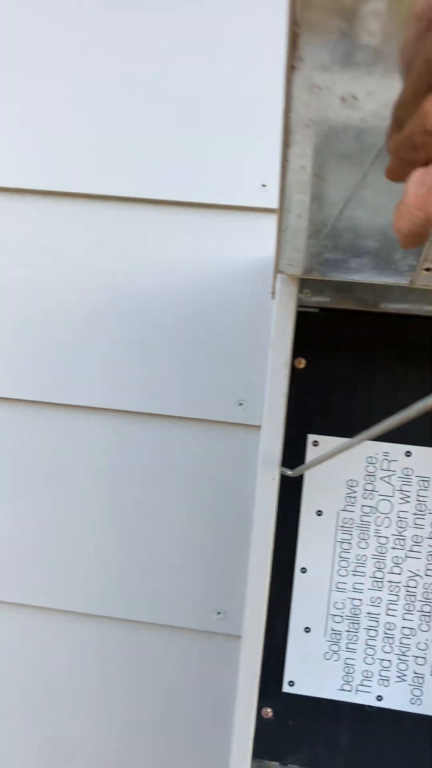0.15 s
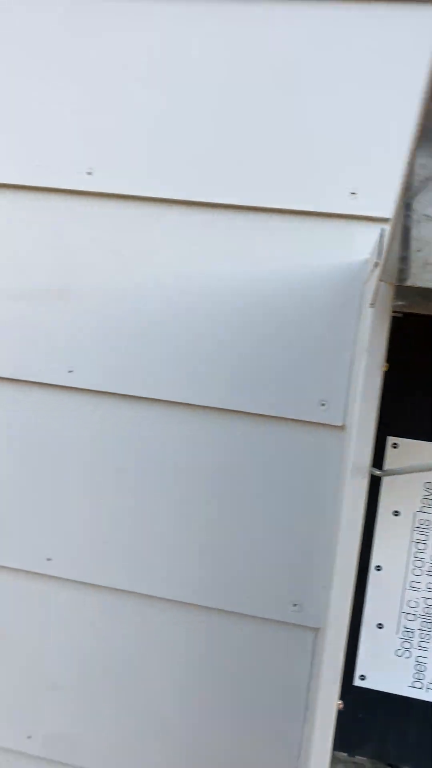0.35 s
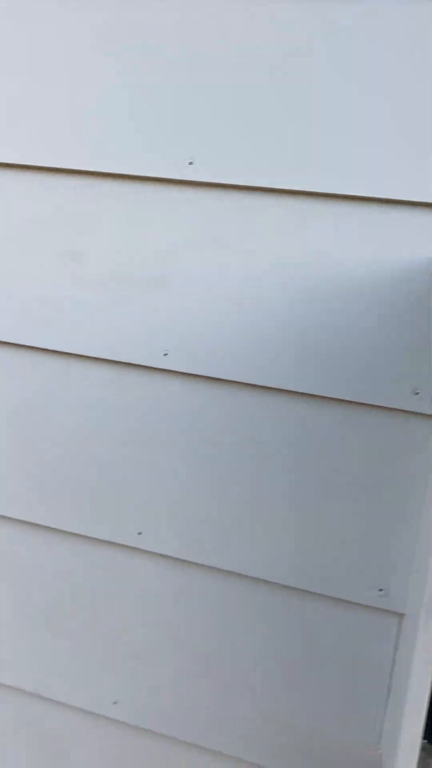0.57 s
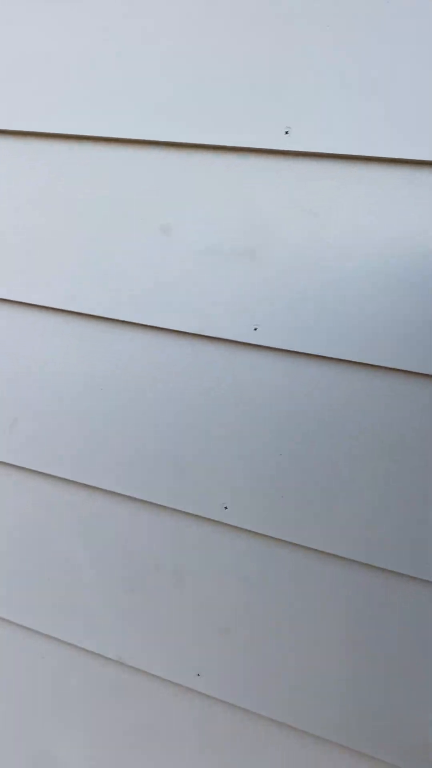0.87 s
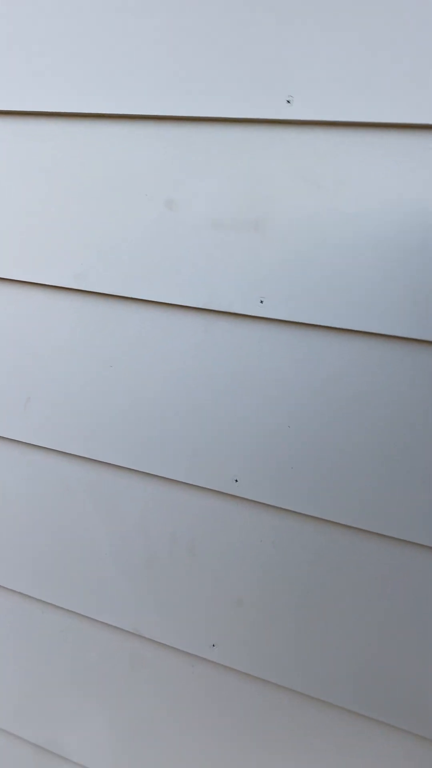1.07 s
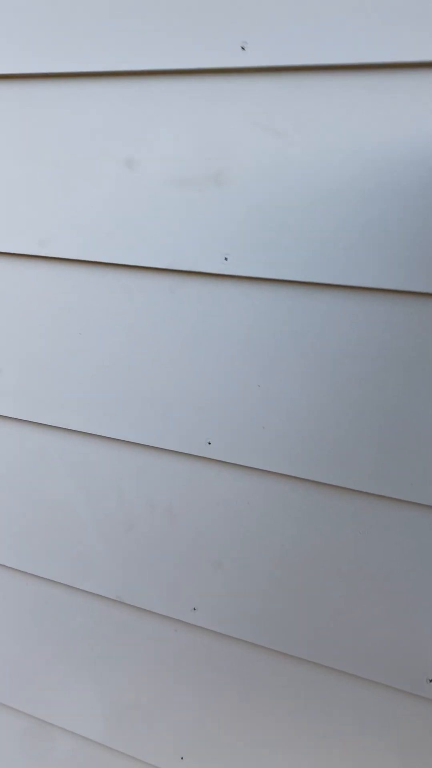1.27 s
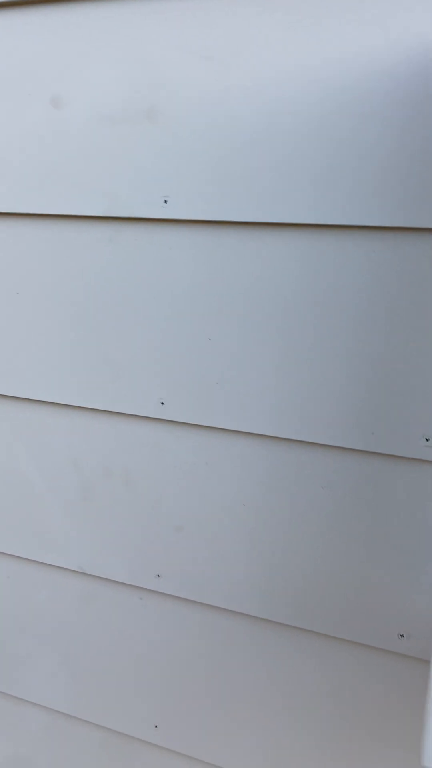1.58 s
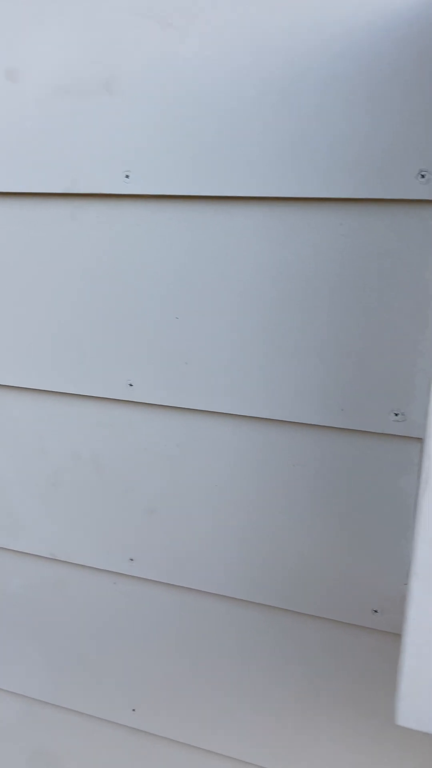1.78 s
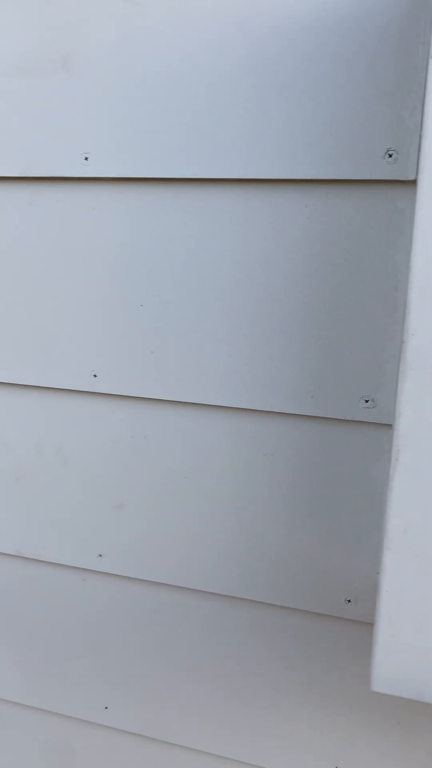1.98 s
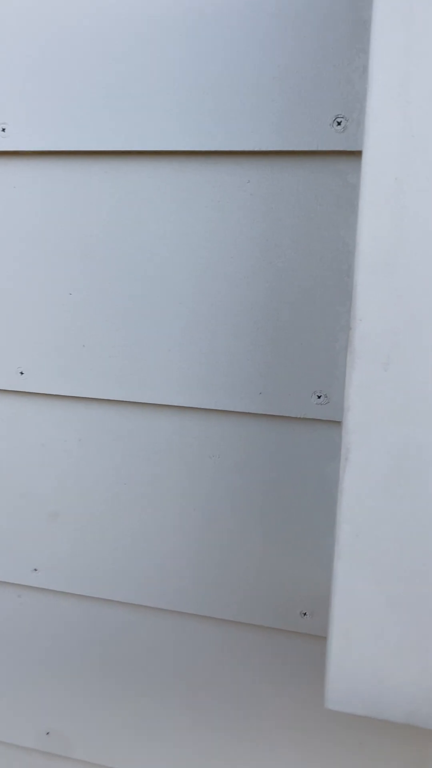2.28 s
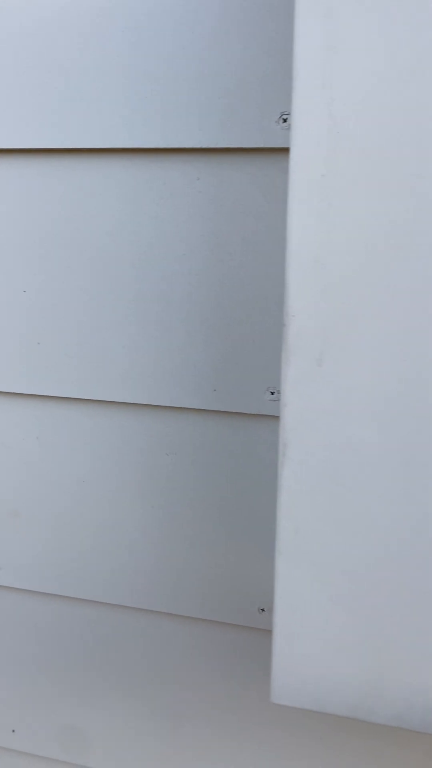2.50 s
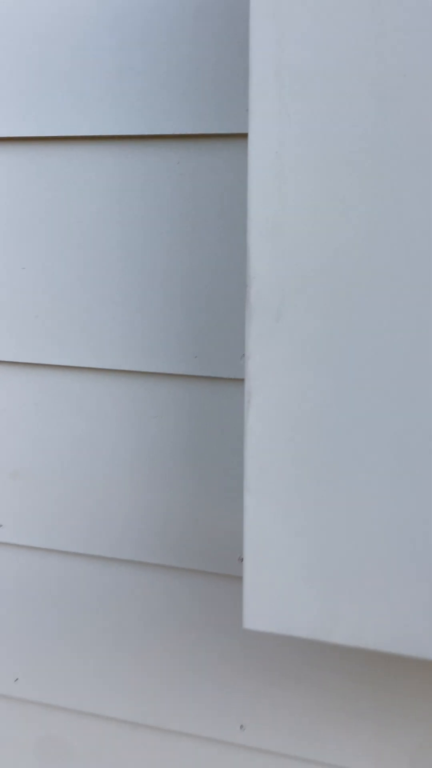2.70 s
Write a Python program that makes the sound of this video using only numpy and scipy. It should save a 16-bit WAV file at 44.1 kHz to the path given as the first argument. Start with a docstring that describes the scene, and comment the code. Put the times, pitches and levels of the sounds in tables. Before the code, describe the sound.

Close to a metal box on a house wall, quiet air, then a sharp rod clatter with thin ringing, a low hinge judder, light scrapes and a hard lid slam, followed by tiny ticks.

```python
"""Low rumble and quiet outdoor air are heard first, with a faint lid tap, scuffs and ticks: a metal box on a house wall.
Its steel stay rod drops and clatters on the frame: noise bursts over damped modes of frame and rod.
The lid shudders on its hinge (a gliding harmonic tone and scrape), rubs past the edge, touches and slams
shut (an air pulse, a crash and panel modes). Small ticks follow the slam; shaped noise gives scuffs and murmur.
"""
import sys
import numpy as np
from scipy import signal
from scipy.fft import rfft, irfft, next_fast_len
from scipy.io import wavfile
from scipy.ndimage import map_coordinates

SR = 44100
rng = np.random.default_rng(int(sys.argv[2]) if len(sys.argv) > 2 else 0)


def wrap_up_sound(samples):
    """Save the sound to the file named by the first command line argument, as 16-bit audio."""
    columns = np.atleast_2d(samples).T
    # keep every value between -1 and 1, then stretch to whole-number steps
    tamed = np.clip(columns, -1, 1)
    steps = np.round(tamed * 32767).astype(np.int16)
    wavfile.write(sys.argv[1], SR, steps)


N = 125685  # samples
T = np.arange(SR * 3 // 4) / SR  # s from the start of one contact
CRASH_DB = -11.5  # crash gain within any contact


def amp(db):
    """Level to amplitude: 20 dB is a factor of ten."""
    return 10 ** (np.asarray(db) / 20)


def unit(x):
    """Normalisation to an rms of 1."""
    return x / np.sqrt(np.mean(x ** 2) + 1e-20)


def along(points, hz):
    """Interpolation of (f/Hz, value) points on a logarithmic frequency axis."""
    f, v = np.transpose(points)
    return np.interp(np.log(hz + 1), np.log(f + 1), v)


def curves(rows):
    """Linear interpolation in time: one curve for each column after t/s."""
    s, *columns = np.transpose(rows)
    return [np.interp(np.arange(N) / SR, s, column) for column in columns]


def wobble(rate):
    """Slow random modulation: a smooth curve through random knots, rate knots a second."""
    knots = rng.standard_normal(int(N * rate / SR) + 4)
    return map_coordinates(knots, [np.arange(N) * rate / SR])


def hiss(colour, flutter_db, rate):
    """Spectral shaping of white noise, with a fluttering level and an rms of 1."""
    spectrum = rfft(rng.standard_normal(N))
    gain = amp(along(colour, np.fft.rfftfreq(N, 1 / SR)))
    coloured = irfft(spectrum * gain, N)
    return unit(coloured * amp(flutter_db * wobble(rate)))


def add(track, s, x):
    """Superposition: mix x into track from time s."""
    start = round(s * SR)
    track[start:][:len(x)] += x[:N - start]


def knock(hz, db, t60):
    """Single damped oscillator: one short note, falling 60 dB in t60."""
    return amp(db - 60 * T / t60) * np.sin(2 * np.pi * hz * T)


def snap(db, t60):
    """Impulsive contact noise: differencing brightens it, and it decays exponentially."""
    bright = np.diff(rng.standard_normal(len(T) + 1))
    return amp(db - 60 * T / t60) * bright


def ring(pitches, decays, tilt_db, favoured_hz):
    """Modal superposition: damped, beating modes; the struck spot favours those near one pitch."""
    favour_db, favour_octaves = 11, .15
    roughness = 0.23  # depth of the beating
    out = 0
    for hz, (db, t60) in zip(pitches, decays):
        spot_db = favour_db * np.exp(-(np.log2(hz / favoured_hz) / favour_octaves) ** 2)
        start_db = db + spot_db + tilt_db * np.log2(hz / 1000) + rng.normal(0, 1.5)
        beat = 1 + roughness * np.cos(2 * np.pi * (rng.uniform(40, 45) * T + rng.random()))
        out = out + amp(start_db - 60 * T / t60) * beat * np.sin(2 * np.pi * hz * T)
    return out


def crash(colour, dies, tilt_db):
    """High modal density in sheet metal: noise in which each band dies at its own speed."""
    hz, t, z = signal.stft(rng.standard_normal(len(T)), SR, nperseg=512, noverlap=448)
    gain = unit(amp(along(colour, hz) + tilt_db * np.log2((hz + 20) / 1000)))
    decay = amp(-60 * t / along(dies, hz)[:, None])
    _, x = signal.istft(z * gain[:, None] * decay, SR, nperseg=512, noverlap=448)
    return x[:len(T)]


def rod():
    """Impact excitation: contacts crack, crash and ring frame and rod; the next contact damps the rod."""
    # Rod contacts: t/s, level/dB, crash brightness/(dB per octave), crack/dB,
    # frame ring/dB, rod ring/dB, favoured frame f/Hz, favoured rod f/Hz
    rod_hits = [(0.616, -6.5, 0, -8.5, -1, 2, 697, 14200), (0.636, -5, 3.5, -7.5, -9, -0.5, 1562, 14100),
                (0.644, -7.5, .6, -3.5, -12, 2, 4320, 14200), (0.689, -28, 3.5, -16, -2, 19.5, 4370, 11300),
                (0.746, -45, -3.5, -19, 2.5, 22, 2250, 11520),
                (0.844, -3.5, 0.4, -8.5, -6.5, -6.5, 482.5, 9285),
                (0.851, -10, -3, -5, -6.5, 0, 1279, 9285), (1.0677, -21, -0.4, -8.5, -0.5, -18, 1073, 9300),
                (1.109, -37, -3, -19, -6.5, -9, 1135, 9300)]
    # Crash spectrum: f/Hz, level/dB
    crash_colour = [(71, -45), (120, -20.5), (524, -7.5), (789, -18), (1240, -5.5), (5520, -9),
                    (7980, -20.5), (10800, -14), (16000, -29.5)]
    # Crash decay: f/Hz, t60/s
    crash_dies = [(200, 0.37), (600, 0.29), (1500, 0.12), (4000, 0.091), (9000, 0.1), (15000, 0.067)]
    # Frame modes: f/Hz
    frame_modes = [190, 275, 441, 495, 673, 1104, 1157, 1297, 1491, 1707, 1873, 2121, 3240]
    # Frame modes, same order: level/dB, t60/s
    frame_decays = [(-5, .3), (-7.5, 0.5), (-11.5, 0.63), (-3.5, 0.26), (-2.5, 0.24), (-9.5, 0.071),
                    (-9, 0.3), (-8, .2), (2, 0.11), (-9, .15), (-16.5, 0.068), (-8, .12), (-8, 0.13)]
    # Rod modes: f/Hz
    rod_modes = [4240, 7970, 9285, 10060, 11520, 12680, 14200, 15640]
    # Rod modes, same order: level/dB, t60/s (until the next contact)
    rod_decays = [(2, 0.04), (-2, 0.045), (-18, 0.53), (-8, 0.17), (-9.5, 0.39), (-14.5, 0.24), (-9, .35),
                  (-9.5, .3)]
    frame_gain_db, rod_gain_db = -17.5, -33.5
    rise_s, grip_s = 0.00061, .004  # onset; how fast a new contact stills the rod

    out = np.zeros(N)
    next_times = [row[0] for row in rod_hits[1:]] + [N / SR]
    for row, later in zip(rod_hits, next_times):
        s, db, tilt_db, crack_db, frame_db, rod_db, frame_hz, rod_hz = row
        x = amp(CRASH_DB) * crash(crash_colour, crash_dies, tilt_db)
        x += snap(crack_db, t60=0.018)
        # The struck spot adds its own short note to the frame's modes
        frame = ring(frame_modes, frame_decays, 0, frame_hz) + knock(frame_hz, db=5, t60=.12)
        x += amp(frame_gain_db + frame_db) * frame
        grip = np.exp(-np.maximum(T - (later - s), 0) / grip_s)
        x += amp(rod_gain_db + rod_db) * ring(rod_modes, rod_decays, 0, rod_hz) * grip
        add(out, s, amp(db) * x * (1 - np.exp(-T / rise_s)))
    return out


def lid():
    """Impact and volume displacement: each contact pushes air, crashes and rings the panel."""
    # Lid contacts: t/s, level/dB, brightness/(dB per octave), panel ring/dB,
    # favoured panel f/Hz, rise/s, air push/dB, push time scale/s
    lid_hits = [(0.088, -35, 0.5, 3.5, 134.7, 0.001, -11, 0.00085),
                (1.412, -29.5, -4.5, -6.5, 55.7, 0.007, -0.5, 0.0031),
                (1.454, -32.5, -3.5, -4, 662, 0.0025, -3, .0008),
                (1.902, -29.5, 0.07, 8.5, 104, 0.001, -4, .002),
                (2.2018, -13.5, -0.75, 3.5, 159, 0.0031, -6, 0.0014),
                (2.2613, -4.5, 0.6, 7, 2020, 0.0005, 3, 0.00022)]
    # Crash spectrum: f/Hz, level/dB
    crash_colour = [(24, -48), (40, 6), (412, -3), (1150, -5), (2150, -11), (2840, -16), (4800, -13.5),
                    (5440, -22), (12100, -36), (16000, -47)]
    # Crash decay: f/Hz, t60/s
    crash_dies = [(60, 0.39), (250, 0.33), (700, 0.26), (2000, .18), (4000, .14), (10000, 0.073)]
    # Panel modes: f/Hz
    panel_modes = [55, 103, 133, 158, 180, 219, 258, 401, 435, 517, 641, 985, 1480, 1970, 2062]
    # Panel modes, same order: level/dB, t60/s
    panel_decays = [(-9, 0.44), (4, 0.51), (-8.5, .4), (-4, .4), (-15.5, 0.54), (-11, 1), (-1, .6),
                    (-16.5, 0.87), (3, 0.21), (-3, 0.4), (-17, 0.68), (0.5, 0.11), (-8.5, 0.21),
                    (-11.5, .17), (-11, .19)]
    panel_gain_db = -25

    out = np.zeros(N)
    for s, db, tilt_db, panel_db, panel_hz, rise, push_db, width in lid_hits:
        x = amp(CRASH_DB) * crash(crash_colour, crash_dies, tilt_db)
        # The struck spot adds its own short thud to the panel's modes
        panel = ring(panel_modes, panel_decays, tilt_db, panel_hz) + knock(panel_hz, db=-1, t60=0.029)
        x += amp(panel_gain_db + panel_db) * panel
        x *= 1 - np.exp(-(T / rise) ** 2)
        # Pressure swings up, then below zero, with no net area
        u = T / width
        push = 2 * u * (2 - u) * np.exp(-u)
        add(out, s, amp(db) * (x + amp(push_db) * push))
    return out


def shudder():
    """Stick-slip oscillation: the hinge shakes the lid at a low, wavering harmonic pitch and scrapes."""
    # Hinge judder: t/s, f/Hz, level/dB
    judder = [(1.42, 120.2, -49), (1.458, 136.1, -23), (1.476, 130.7, -24.5), (1.522, 129.7, -32.5),
              (1.532, 142, -29.5), (1.564, 130.6, -34.5), (1.586, 130, -48.5), (1.592, 126, -37.5),
              (1.61, 114.8, -34.5), (1.64, 120, -61), (1.66, 119, -48), (1.678, 126, -47),
              (1.696, 139.8, -55), (1.72, 140.4, -46.5)]
    # Overtones: multiple of the fundamental, level relative to it/dB
    overtones = [(2, -22.5), (3, -22), (4, -33)]
    # Scrape spectrum: f/Hz, level/dB
    scrape_colour = [(120, -36), (200, -10), (364, -1), (534, -8.5), (773, -15), (1040, -19), (1890, -24.5),
                     (6000, -43.5), (7800, -68.5), (13200, -120)]
    scrape_db, scrape_follows = -43, 0.59  # level at the strongest judder; share of its dB swings
    roughness, fade_s = 0.26, 0.0063

    hz, db = curves(judder)
    phase = 2 * np.pi * np.cumsum(hz) / SR
    harmonics = np.sin(phase) + sum(amp(d) * np.sin(k * phase) for k, d in overtones)
    tone = np.sqrt(2) * harmonics  # fundamental of rms 1
    rough_tone = amp(db) * tone * (1 + roughness * wobble(90))

    top_db = max(row[2] for row in judder)
    scrape_level = amp(scrape_db + scrape_follows * (db - top_db))
    scrape = scrape_level * hiss(scrape_colour, flutter_db=1.5, rate=50)

    t = np.arange(N) / SR
    on = np.clip(np.minimum(t - judder[0][0], judder[-1][0] - t) / fade_s, 0, 1)
    return on * (rough_tone + scrape)


def scuffs():
    """Sliding friction: brief dry rubs, each a swell of grainy noise."""
    # Rubs: centre t/s, length/s, level/dB, brightness/(dB per octave)
    rubs = [(0.212, 0.049, -61, -2), (0.486, 0.15, -56, -8.5), (0.573, 0.12, -69.5, 4),
            (1.24, 0.28, -61.5, -1), (1.435, .04, -66, 4.5), (1.697, 0.044, -66.5, 6),
            (1.763, 0.086, -49, -2), (1.854, 0.05, -45.5, -2), (1.904, 0.032, -47.5, -1),
            (1.976, 0.16, -51, -4), (2.085, .06, -65.5, 1.5), (2.624, 0.037, -65, 2.5),
            (2.743, 0.032, -66.5, -1)]
    # Rub spectrum before brightness: f/Hz, level/dB
    rub_colour = [(180, -32.5), (300, -1), (1660, -10), (2880, -22), (3400, -13), (7820, -22),
                  (12500, -24.5), (16000, -31)]
    out, t = np.zeros(N), np.arange(N) / SR
    for s, length, db, tilt_db in rubs:
        colour = [(hz, level + tilt_db * np.log2(hz / 4000)) for hz, level in rub_colour]
        swell = np.exp(-((t - s) / length * 2) ** 2)
        out += amp(db) * swell * hiss(colour, flutter_db=1, rate=450)
    return out


def ticks():
    """Small impulses: tiny loose parts settle with a snap and a short damped note."""
    # Ticks: t/s, note level/dB, f/Hz, snap level/dB
    tick_rows = [(.3835, -63, 10500, -66), (0.444, -57, 5460, -62), (2.336, -45.5, 4170, -65),
                 (2.354, -50, 4460, -65), (2.392, -56, 4200, -74), (2.4185, -54.5, 4300, -74)]
    t60 = 0.013  # s
    out = np.zeros(N)
    for s, db, hz, snap_db in tick_rows:
        add(out, s, knock(hz, db, t60) + snap(snap_db, t60))
    return out


def background():
    """Broadband noise with slow envelopes: murmur of the moving box, low rumble and steady air."""
    # Box and air murmur: t/s, level/dB
    body = [(0.0, -55.5), (0.24, -57.5), (0.48, -68.5), (0.71, -40.5), (0.78, -47), (0.82, -54),
            (1.16, -55), (1.43, -57.5), (1.63, -58), (1.87, -42), (2.0, -52), (2.21, -51), (2.34, -59),
            (2.39, -46), (2.56, -62.5), (2.62, -86.5), (2.85, -64)]
    # Murmur spectrum: f/Hz, level/dB
    body_colour = [(88, -11.5), (150, 14), (221, -7.5), (261, 3.5), (310, 0), (1590, -13.5), (1720, -14.5),
                   (2040, -20.5), (6000, -37), (7800, -72.5), (13200, -120)]
    # Low rumble: t/s, level/dB
    rumble_rows = [(0, -67), (.07, -57), (.11, -52), (.2, -58), (.42, -55.5), (.6, -60), (.82, -52),
                   (.95, -52), (1.06, -56.5), (1.12, -47), (1.36, -63), (1.405, -58), (1.42, -30.5),
                   (1.6, -38), (1.75, -43.5), (1.88, -52), (1.96, -30), (2.05, -50), (2.19, -37),
                   (2.21, -31), (2.28, -25.5), (2.45, -41.5), (2.6, -44.5), (2.85, -61)]
    # Rumble spectrum: f/Hz, level/dB
    rumble_colour = [(8.8, -27.5), (15, 7), (87, -6), (140, -10), (178, -11), (210, -20), (250, -17),
                     (320, -44), (550, -120)]
    # Air spectrum: f/Hz, level/dB
    air_colour = [(35, -23.5), (60, -8.5), (274, -32.5), (380, -2), (903, -12), (1040, -13.5), (1700, -8),
                  (3270, -17), (16000, -31)]
    murmur = amp(curves(body)[0]) * hiss(body_colour, flutter_db=-2.5, rate=100)
    rumble = amp(curves(rumble_rows)[0]) * hiss(rumble_colour, flutter_db=6, rate=15)
    air = amp(-69) * hiss(air_colour, flutter_db=1, rate=5)
    return murmur + rumble + air


def scene():
    """Linear superposition of all sources in one channel."""
    return (rod() + lid() + shudder() + scuffs() + ticks() + background())[None]


def record(dry):
    """Band limiting: a spectral slope reaches zero at the top frequency."""
    top_hz, slope_hz = 16500, 800
    m = next_fast_len(N + 8192)
    gain = np.clip((top_hz - np.fft.rfftfreq(m, 1 / SR)) / slope_hz, 0, 1) ** 2
    return irfft(rfft(dry, m) * gain, m)[..., :N]


dry = scene()
out = record(dry)
wrap_up_sound(out)
```